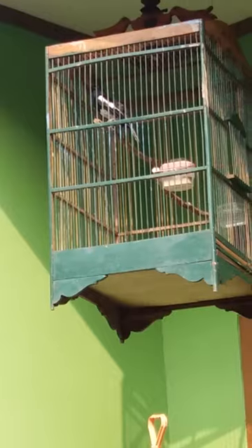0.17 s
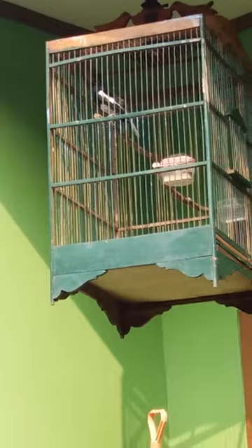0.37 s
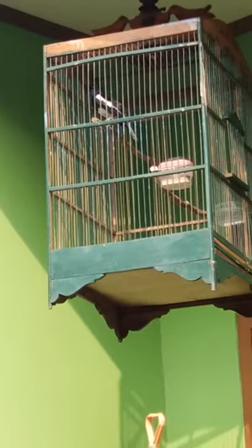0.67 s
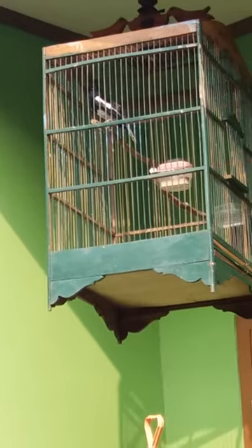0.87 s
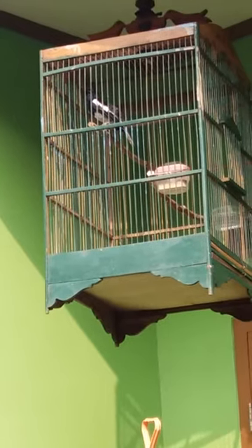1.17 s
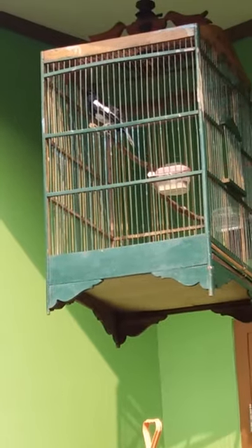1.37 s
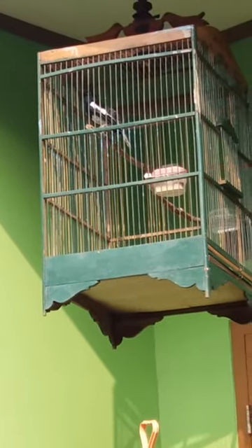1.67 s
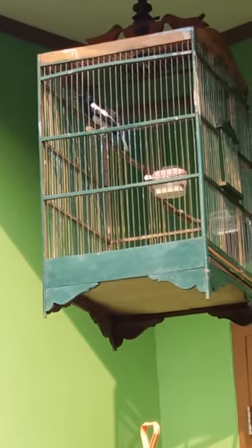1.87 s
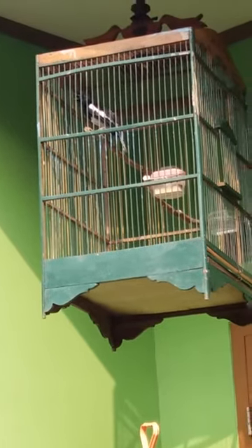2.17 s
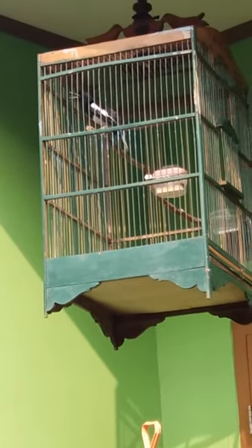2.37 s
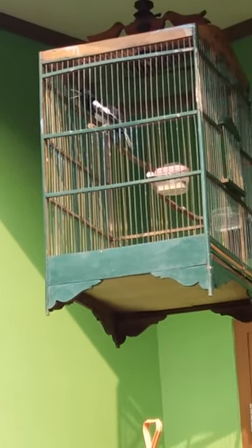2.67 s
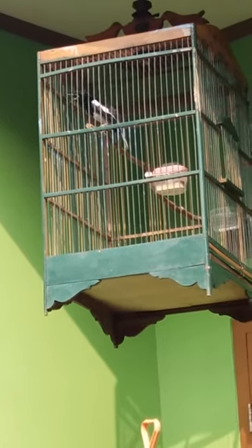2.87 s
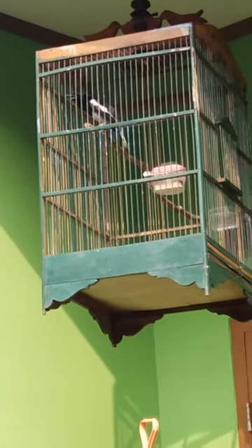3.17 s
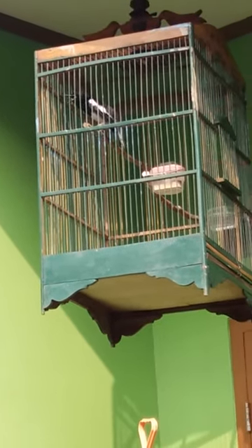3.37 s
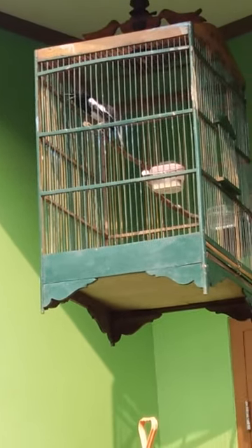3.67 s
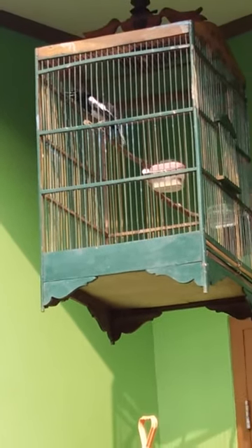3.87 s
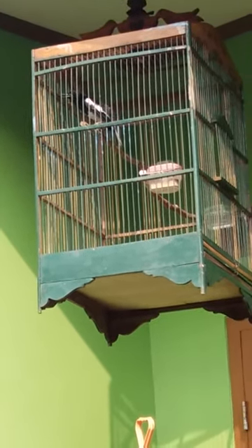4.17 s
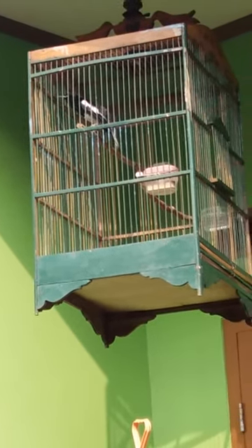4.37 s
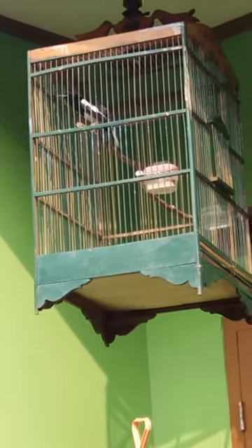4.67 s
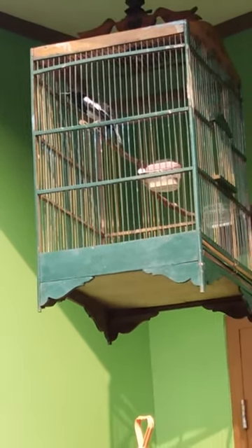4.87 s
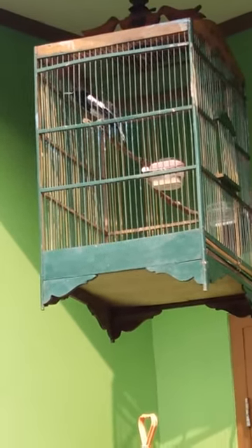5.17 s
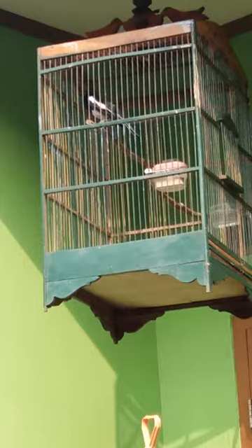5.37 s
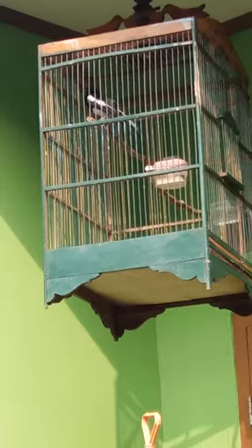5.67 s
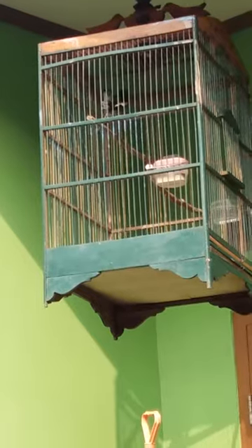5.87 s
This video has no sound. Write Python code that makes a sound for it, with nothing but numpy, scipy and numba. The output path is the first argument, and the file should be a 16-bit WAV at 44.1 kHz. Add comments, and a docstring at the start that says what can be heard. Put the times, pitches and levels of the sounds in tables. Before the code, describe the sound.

A quiet, hard-walled porch with soft, low town rumble and very faint microphone hiss. Around 0.4 to 0.6 seconds there is a slight dull rustle and a barely audible far bird. At 1.8 the caged bird starts with a softer whistle that swells, rises and drops away. From 2.2 it sings loudly: a sharp high start sliding down, a wavering warbled note at 2.55, a higher note at 2.8, a quick jumpy chirp at 3.0, a trembling note at 3.2, the strongest steady whistle at 3.4, and a gently falling warble at 3.6. From 3.9 a softer note leaps much higher, and a quick up-and-down flick ends the phrase by 4.25. Each near-pure tone rings for about a third of a second. Rumble and a tiny rustle fill the gap. At 5.1 comes one short, very high peep, dropping at its end, then quiet until 6.

```python
"""Caged songbird in a bare porch

A caged bird whistles a phrase of gliding, warbled notes, then one short high note; each is a near sine with weak
overtones. Hard walls close around it, a web of delay lines, ring each note on for about a third of a second.
Beneath lie a far bird and faint low tones (soft-edged sines), rustles close by (filtered noise puffs), town rumble
(bands of noise) and the microphone's own hiss with a thin steady whine."""
import sys
import numpy as np
from scipy import signal
from scipy.fft import rfft, irfft, next_fast_len
from scipy.io import wavfile
from scipy.ndimage import uniform_filter1d, minimum_filter1d
from numba import njit

SR = 44100
rng = np.random.default_rng(int(sys.argv[2]) if len(sys.argv) > 2 else 0)


def int16_out(signal):
    """Quantize to a 16-bit WAV file."""
    q = np.round(np.clip(np.atleast_2d(signal).T, -1, 1) * 32767)
    wavfile.write(sys.argv[1], SR, q.astype(np.int16))


N = 264688  # samples, about 6 s

# Town rumble, spectrum of the noise: pitch_hz, relative level_db per Hz
TOWN_SPECTRUM = [(15, -57), (25, -26.5), (32, -22.5), (50, -10), (96, -0.5), (218, -5.5), (323, -8),
                 (363, -11), (635, -15), (900, -16), (1010, -18), (1140, -19.5), (1430, -21.5),
                 (2280, -25.5), (4600, -37.5), (6500, -49), (8450, -79), (14300, -120)]
# Slow change of the rumble: time_s, change_db
TOWN_SWELL = [(0, -0.5), (1.002, -1.5), (2.301, 2), (4.2, 2), (5.3, 0.5), (6, 0.5)]
# Microphone hiss, spectrum of the noise: pitch_hz, relative level_db per Hz
HISS_SPECTRUM = [(2500, -30), (5000, -3), (7000, 0), (15600, 1)]
# Thin steady whine: pitch_hz, level_db
WHINES = [(14998, -95)]
# Soft rustles close by: start_s, length_s (scale of the fade), centre_hz, width_hz, level_db (before fade and dulling)
RUSTLES = [(.397, .11, 900, 2280, -54), (.52, 0.027, 2200, 1400, -60), (2.48, 0.11, 900, 1390, -54),
           (2.70, .13, 1100, 1400, -51), (4.622, 0.095, 701, 1186, -52.5)]
# Faint low tones, before they waver in level: start_s, end_s, pitch_hz, level_db
FAINT_TONES = [(0.676, .825, 910, -70), (0.735, 0.86, 674, -66), (0.867, .98, 372, -60),
               (1.0, 1.6, 888, -70.5), (1.842, 2.25, 300, -59.5), (2.459, 2.6, 950, -62.5),
               (2.424, 2.562, 100.4, -54.5), (3.288, 3.564, 733, -68), (3.922, 4.097, 99, -57.5),
               (4.106, 4.286, 309, -62.5), (4.4, 4.6, 509, -72.5), (4.782, 5.196, 786.4, -72.5),
               (5.867, 5.993, 365.7, -63), (5.884, 6.0, 1115, -69.5)]
# A far bird's whistles, before they flutter: level_db, then a glide of (time_s, pitch_hz)
FAR_BIRD = [(-76, [(.535, 3200), (.585, 3580), (.70, 3620)]), (-78, [(5.02, 3400), (5.07, 3560),
            (5.17, 3620)])]
# Near bird's notes, before the porch: level_db, swell_db over the note, attack_s, release_s, second_db and third_db
# (2nd and 3rd partials against the 1st), leak_db_per_octave (overtone gain under the throat's tuning), flutter_percent
NOTES = [(-23.5, 10, 0.06, 0.047, -38.5, -51.5, 42, 0.2), (-11.5, -1, 0.021, 0.035, -38.5, -52, 40.5, 0.16),
         (-12, 0, .008, 0.035, -38.5, -54, 28, 0.39), (-14.5, 6.5, 0.005, .035, -35.5, -45.5, 12, 0.09),
         (-13.5, 3.5, 0.023, 0.045, -35, -46.5, 61.5, 1.2), (-12, -4, .012, 0.0088, -34.5, -48, 31, 1.1),
         (-7, -0.5, 0.022, .03, -32, -59.5, 13, 0.12), (-13.5, 3.5, .025, 0.052, -38, -52, 31, 0.065),
         (-20, 2, 0.042, 0.013, -37.5, -46.5, 36.5, 0.13),
         (-20.5, 6, 0.019, 0.0085, -32.5, -44, 29.5, 0.14),
         (-46, -3.5, 0.0029, 0.0016, -36, -30, 25, 0.053), (-20, -10.5, 0.0058, 0.0037, -33, -48, 43, 2.4),
         (-61.5, 32, 0.025, .015, -68.5, -78, 30, 0.12)]
# Glide of each note, before warble and flutter: time_s, pitch_hz
GLIDES = [
    [(1.80, 2102), (1.83, 2168), (1.895, 2447), (1.93, 2462), (1.97, 2295), (2.04, 2169), (2.072, 1889)],
    [(2.236, 3120), (2.272, 3525), (2.285, 2820), (2.30, 2681), (2.33, 2585), (2.40, 2579), (2.435, 2540),
     (2.458, 1814)],
    [(2.545, 2590), (2.60, 3000), (2.69, 3060), (2.716, 2200)],
    [(2.81, 3895), (2.83, 4075), (2.87, 3967), (2.936, 3920), (2.95, 3370), (2.962, 3440)],
    [(3.016, 2500), (3.024, 2650), (3.029, 3713), (3.044, 3050), (3.06, 3417), (3.09, 3620), (3.102, 2700),
     (3.118, 2648), (3.13, 2200)],
    [(3.173, 2000), (3.19, 2886), (3.245, 2820), (3.26, 2450), (3.277, 2040)],
    [(3.373, 2610), (3.385, 3234), (3.40, 3279), (3.49, 3276), (3.50, 2990), (3.516, 2953)],
    [(3.62, 3317), (3.65, 3285), (3.695, 3290), (3.733, 3150), (3.806, 2930)],
    [(3.93, 2970), (3.96, 3133), (3.992, 3180)],
    [(3.995, 3180), (4.02, 3182), (4.058, 3130), (4.072, 5740), (4.09, 5455), (4.12, 4876), (4.15, 4740)],
    [(4.10, 2645), (4.115, 2550), (4.14, 2480)],
    [(4.15, 1815), (4.172, 3800), (4.19, 4620), (4.21, 4400), (4.25, 1900)],
    [(5.075, 5750), (5.10, 5920), (5.15, 6045), (5.168, 5260), (5.178, 4080)],
]
# Warbles that last to the end of their note: start_s, depth_hz
WARBLES = [(2.625, 330), (3.19, 260), (3.695, 290)]
# 4th to 6th partials of the voice: level_db against the 3rd
UPPER_DB = [-12, -6.5, -7.5]
# The voice catches as some notes start or stop: time_s, centre_hz, width_hz (of each of two passes), level_db
CATCHES = [(2.065, 3480, 1245, -53.5), (2.234, 3830, 493, -47.5), (2.705, 3620, 1200, -42),
           (2.812, 4200, 1200, -54), (3.378, 4690, 2000, -61), (3.618, 3790, 1400, -49),
           (3.628, 2310, 399.4, -58.5), (3.98, 4750, 1500, -56)]
# Travel between the porch walls: lag in samples
WALL_LAGS = np.array([331, 419, 523, 647, 787, 941, 1093, 1259])
# Scatter off cage bars and corners: lag in samples
SCATTER_LAGS = [113, 199, 307]

TOWN_DB, HISS_DB = -57.5, -85.5  # rumble before its slow change; hiss
FADE_DB = 26  # how far under its level a note starts and ends
WARBLE_HZ = 24  # dips in pitch per second
THROAT_LAG_S = 0.085  # the throat's tuning trails the pitch
MISTUNE_DB = 19  # the whistle's loss per octave off the throat's tuning
PORCH_T60_S, PORCH_DAMP = 0.38, 0.041  # ring time before damping; treble damping per round, 0 to 1
DIRECT_DB, EARLY_DB = -0.5, 0  # straight path and first scatter, against the walls' ring
BEND = 0.0023  # square-law bend of the microphone
LIMIT = .9  # the recorder's ceiling, full scale 1
OFFSET = -.0006  # the converter rests a little under zero, full scale 1
TOP_HZ = 15680  # upper edge of the recorder


def undb(db):
    """Decibels to gain."""
    return 10 ** (np.asarray(db) / 20)


def walk(rate_hz, count=N):
    """Smooth random drift of spread near 1: levels held for 1 / rate_hz, then slewed twice."""
    hold = int(SR / rate_hz)
    steps = np.repeat(rng.standard_normal(count // hold + 1), hold)
    slewed = uniform_filter1d(uniform_filter1d(steps, hold), hold)
    return 1.3 * slewed[:count]


def add(out, start_s, sound):
    """Mix a short sound in at its start time."""
    i = int(start_s * SR)
    out[i:i + len(sound)] += sound[:N - i]


def coloured(spectrum):
    """Frequencies and transform of noise shaped by level points, joined along log frequency."""
    size = next_fast_len(N)
    f = np.maximum(np.arange(size // 2 + 1) * SR / size, 1)
    hz, db = np.transpose(spectrum)
    shape_db = np.interp(np.log(f), np.log(hz), db)
    return f, rfft(rng.standard_normal(size)) * undb(shape_db)


def town():
    """Town rumble: half-octave bands of noise that swell together and flicker alone."""
    f, shaped = coloured(TOWN_SPECTRUM)
    out, swell = 0, walk(3)
    for k in range(18):
        # overlapping triangles, the lowest centred on 25 Hz
        share = np.clip(1 - abs(2 * np.log2(f / 25) - k), 0, 1)
        noise = irfft(shaped * share, next_fast_len(N))[:N]
        out = out + noise * undb(.9 * swell + walk(6))
    level_db = TOWN_DB + np.interp(np.arange(N) / SR, *np.transpose(TOWN_SWELL))
    return undb(level_db) * out / np.std(out)


def hiss():
    """Microphone hiss: steady noise weighted to the treble, with a thin sine whine near the top."""
    noise = irfft(coloured(HISS_SPECTRUM)[1], next_fast_len(N))[:N]
    out = undb(HISS_DB) * noise / np.std(noise)
    t = np.arange(N) / SR
    for hz, db in WHINES:
        out = out + np.sqrt(2) * undb(db) * np.sin(2 * np.pi * hz * t)
    return out


def band(x, hz, width_hz):
    """Resonance of gain 1 at its centre."""
    return signal.lfilter(*signal.iirpeak(hz, hz / width_hz, fs=SR), x)


def rustles():
    """Rustles close by: short dull puffs of noise with a quick rise and a fading tail."""
    out = np.zeros(N)
    for start_s, length_s, hz, width_hz, db in RUSTLES:
        t = np.arange(int(3 * length_s * SR)) / SR / length_s  # in lengths
        puff = band(rng.standard_normal(len(t)), hz, width_hz)
        swell = (1 - np.exp(-16 * t)) * np.exp(-1.6 * t)
        add(out, start_s, undb(db) * puff / np.std(puff) * swell)
    return signal.sosfilt(signal.butter(4, 2600, fs=SR, output="sos"), out)


def glide(rows):
    """Times and pitch along a glide; muscles round the corners."""
    s, hz = np.transpose(sorted(rows))
    t = np.arange(s[0], s[-1], 1 / SR)
    return t, uniform_filter1d(np.interp(t, s, hz), int(0.0057 * SR), mode="nearest")


def whistle(pitch, overtones_db, fade_s=0.0018):
    """A near sine on the given pitch with weak overtones, steady or changing, and soft edges."""
    phase = 2 * np.pi * np.cumsum(pitch) / SR
    tone = np.sin(phase)
    for k, below_db in enumerate(overtones_db, 2):
        representable = k * pitch < .45 * SR
        tone += undb(below_db) * np.sin(k * phase) * representable
    i = np.arange(len(pitch))
    from_edge_s = np.minimum(i, i[::-1]) / SR
    edges = np.sin(np.pi / 2 * np.clip(from_edge_s / fade_s, 0, 1)) ** 2
    return np.sqrt(2) * tone * edges


def far_bird():
    """A far bird: soft-edged gliding sines that flutter in pitch and level."""
    out = np.zeros(N)
    for db, rows in FAR_BIRD:
        pitch = glide(rows)[1]
        flutter = 1 + .01 * walk(250, count=len(pitch))
        add(out, rows[0][0], undb(db) * whistle(pitch * flutter, [], fade_s=.03))
    return out * undb(3.5 * walk(120))


def faint_tones():
    """Faint low tones in the distance: soft-edged sines that waver in pitch and level."""
    out = np.zeros(N)
    for start_s, end_s, hz, db in FAINT_TONES:
        waver = 1 + .005 * walk(60, count=SR)[:int((end_s - start_s) * SR)]
        add(out, start_s, undb(db) * whistle(hz * waver, [], fade_s=0.033))
    return out * undb(2.5 * walk(45))


def note(shape, rows):
    """One note; where the pitch leaves the slower throat behind it thins, and brightens when below its tuning."""
    db, swell_db, attack_s, release_s, second_db, third_db, leak_db_per_octave, flutter_percent = shape
    t, pitch = glide(rows)
    for start_s, depth_hz in WARBLES:
        dips = np.sin(np.pi * WARBLE_HZ * np.maximum(t - start_s, 0)) ** 2
        pitch = pitch - (start_s > t[0]) * depth_hz * dips
    # the throat starts tuned to the note's first half and follows with a lag
    keep, octaves = np.exp(-1 / (THROAT_LAG_S * SR)), np.log2(pitch)
    rest = np.median(octaves[:len(t) // 2])
    throat = signal.lfilter([1 - keep], [1, -keep], octaves - rest) + rest
    off_octaves = throat - octaves
    attack = np.clip(1 - (t - t[0]) / attack_s, 0, 1) ** 2
    release = np.clip(1 - (t[-1] - t) / release_s, 0, 1) ** 2
    level_db = db + swell_db * (t - t[0]) / (t[-1] - t[0])
    level_db = level_db - FADE_DB * (attack + release) - MISTUNE_DB * abs(off_octaves)
    leak_db = leak_db_per_octave * np.maximum(off_octaves, 0)
    overtones_db = [second_db + leak_db, third_db + leak_db, *(third_db + np.array(UPPER_DB))]
    flutter = 1 + flutter_percent / 100 * walk(250, count=SR)[:len(t)]
    return undb(level_db) * whistle(pitch * flutter, overtones_db)


def catches():
    """Where the voice catches: brief puffs of noise through a broad resonance, twice."""
    out = np.zeros(N)
    for time_s, hz, width_hz, db in CATCHES:
        puff = np.r_[rng.standard_normal(400) * np.hanning(400), np.zeros(400)]
        catch = band(band(puff, hz, width_hz), hz, width_hz)
        add(out, time_s - .004, undb(db) * catch / np.std(catch))
    return out


def bird():
    """The caged bird before the porch: its whistled notes and the catches in its voice."""
    out = catches()
    for shape, rows in zip(NOTES, GLIDES):
        add(out, min(rows)[0], note(shape, rows))
    return out


@njit
def walls(x, lags, gain, damp):
    """Ring between walls: eight delay lines that feed each other, duller on every round."""
    line, soft, out = np.zeros((8, 2048)), np.zeros(8), np.zeros(len(x))
    for i in range(len(x)):
        total = 0.
        for k in range(8):
            soft[k] += (1 - damp) * (gain[k] * line[k, (i - lags[k]) & 2047] - soft[k])
            total += soft[k]
            out[i] += soft[k] * (1 - 2 * (k % 2))  # alternate signs
        for k in range(8):
            line[k, i & 2047] = x[i] + soft[k] - total / 4
    return out


def porch(x):
    """The straight path, the scatter off bars and corners (all-pass echoes), and the ring between the walls."""
    early = x + 1e-18  # keeps the filters off vanishingly small numbers
    for lag in SCATTER_LAGS:
        taps = np.zeros(lag + 1)
        taps[0], taps[-1] = -.6, 1
        early = signal.lfilter(taps, taps[::-1], early)
    gain = undb(-60 * WALL_LAGS / SR / PORCH_T60_S)
    ring = walls(early, WALL_LAGS, gain, float(np.clip(PORCH_DAMP, 0, .9)))
    return undb(DIRECT_DB) * x + undb(EARLY_DB) * early + ring / np.sqrt(8)


def scene():
    """The bird in its porch over the surroundings, as one channel."""
    surroundings = town() + hiss() + rustles() + far_bird() + faint_tones()
    return (surroundings + porch(bird()))[None]


def record(dry):
    """The microphone's square-law bend adds low beat tones; a quick limiter holds peaks; the top is cut."""
    low_cut = signal.butter(2, 40, "high", fs=SR, output="sos")
    bent = signal.sosfilt(low_cut, dry + BEND * dry ** 2)
    headroom = minimum_filter1d(LIMIT / np.maximum(abs(bent), LIMIT), size=257, axis=1)
    held = bent * uniform_filter1d(headroom, size=129, axis=1)
    top_cut = signal.ellip(12, .2, 90, TOP_HZ, fs=SR, output="sos")
    return signal.sosfilt(top_cut, held + OFFSET)


dry = scene()
out = record(dry)
int16_out(out)
```